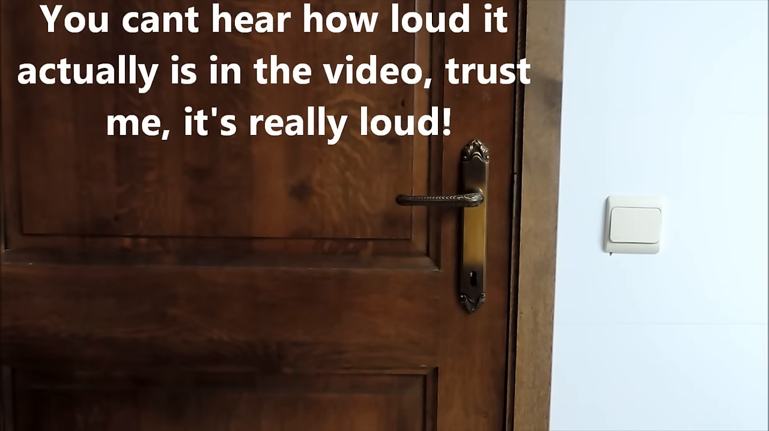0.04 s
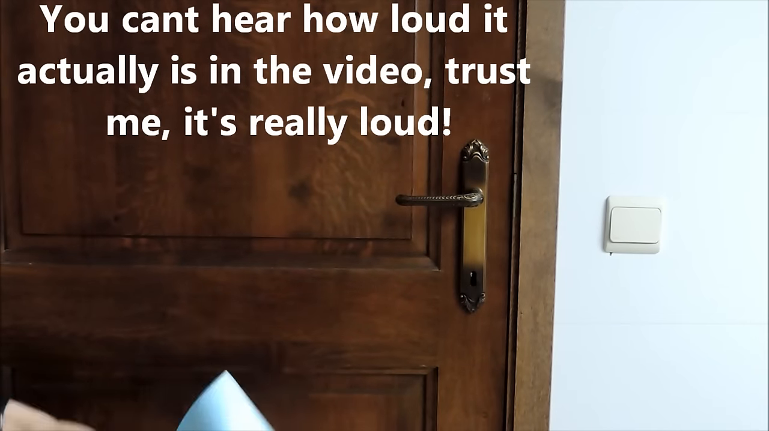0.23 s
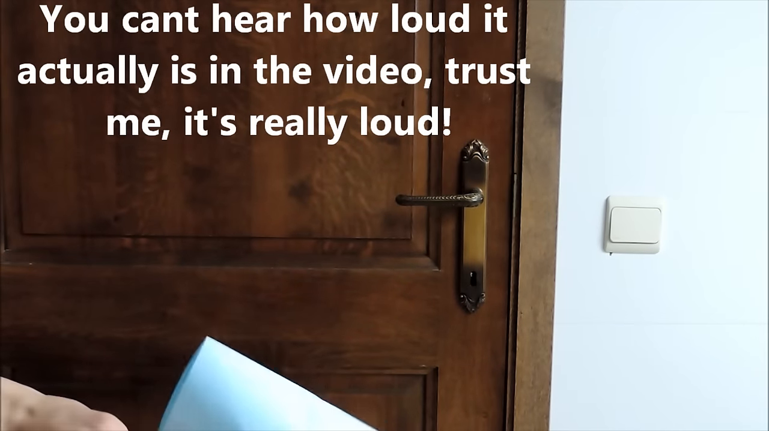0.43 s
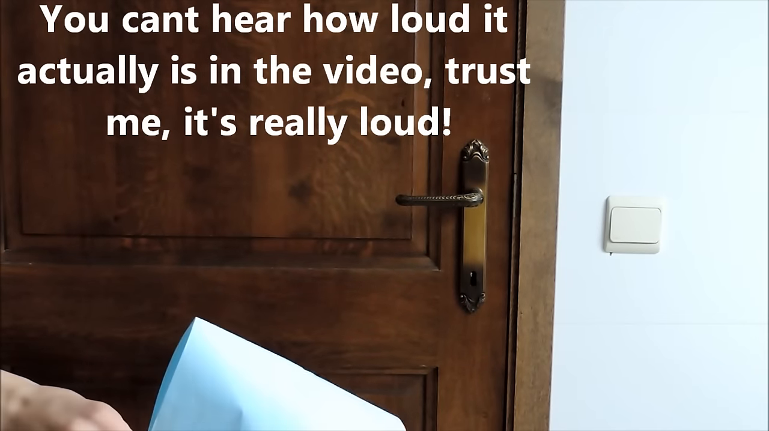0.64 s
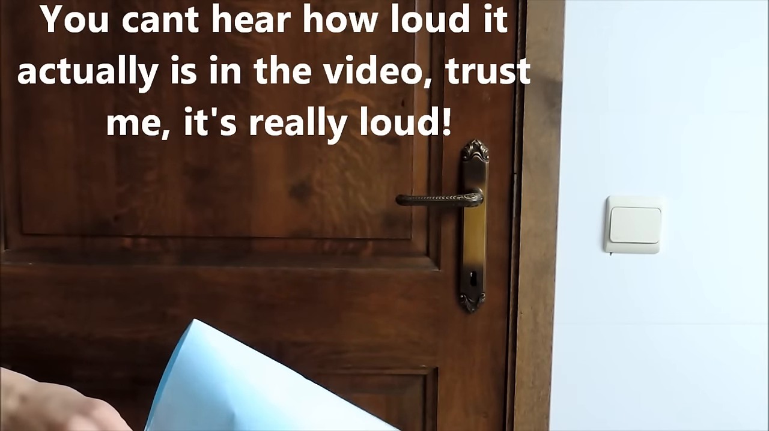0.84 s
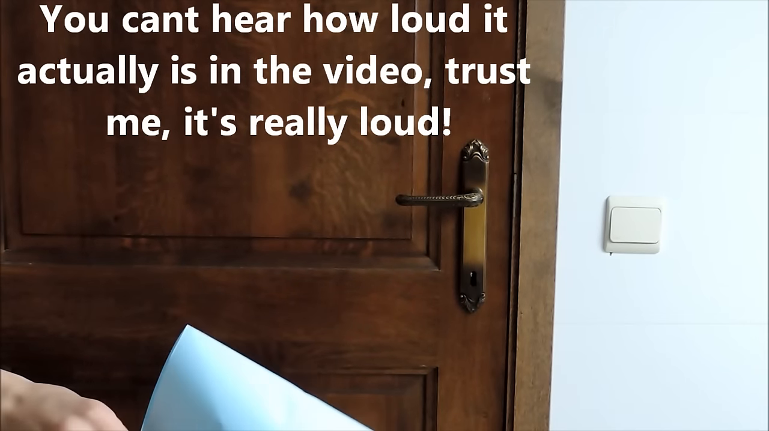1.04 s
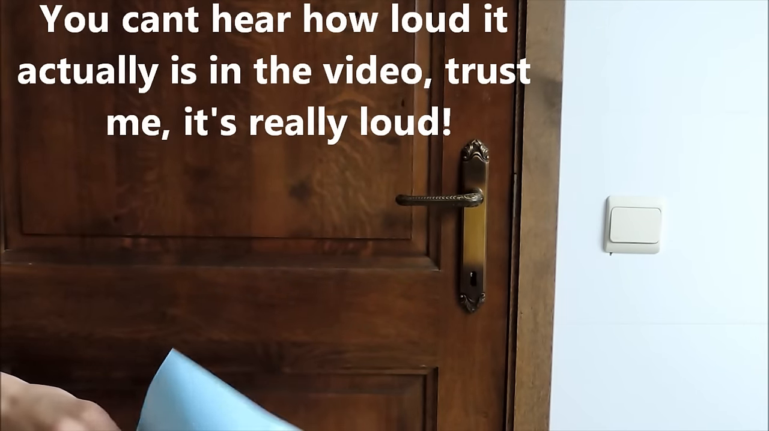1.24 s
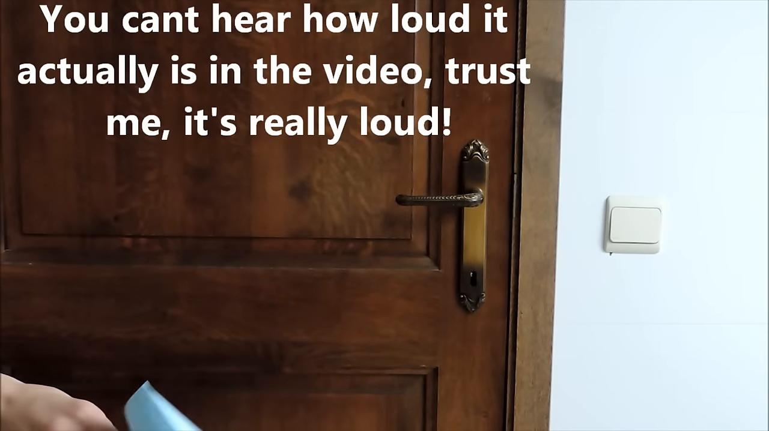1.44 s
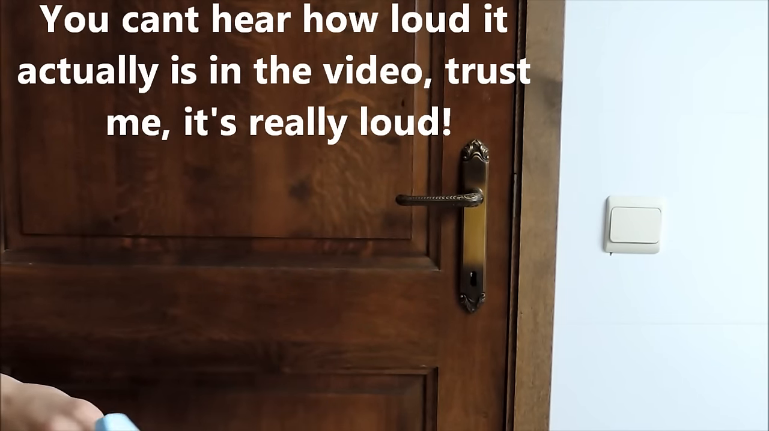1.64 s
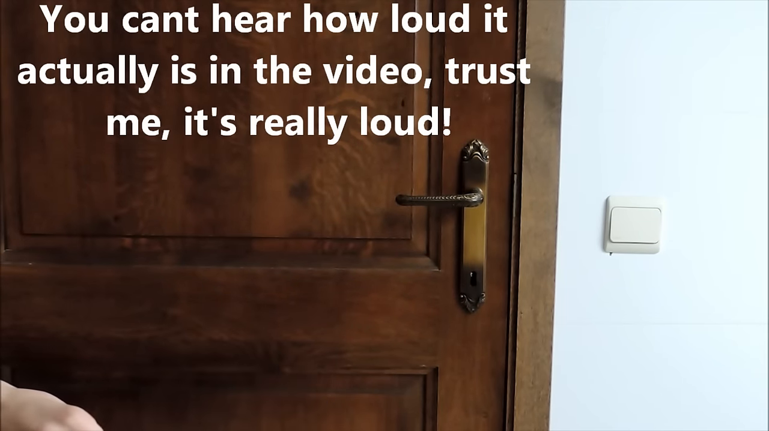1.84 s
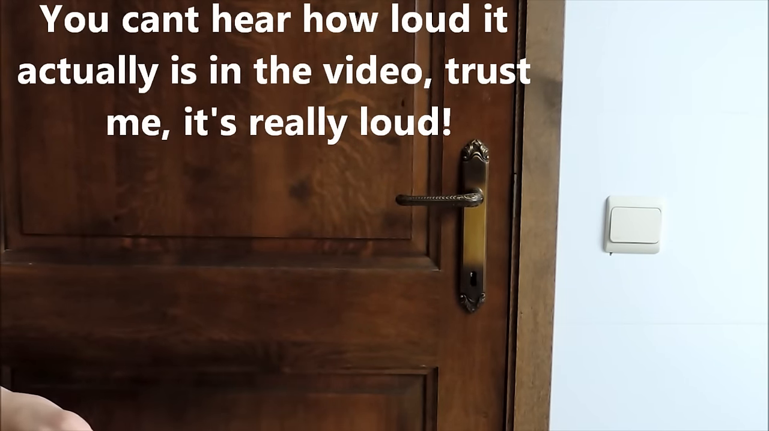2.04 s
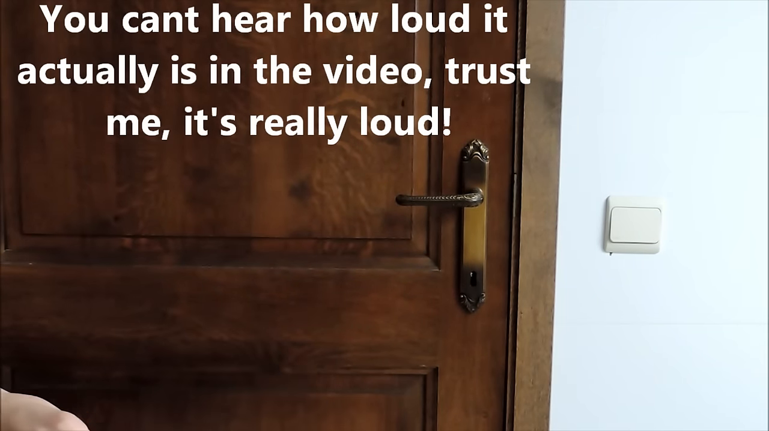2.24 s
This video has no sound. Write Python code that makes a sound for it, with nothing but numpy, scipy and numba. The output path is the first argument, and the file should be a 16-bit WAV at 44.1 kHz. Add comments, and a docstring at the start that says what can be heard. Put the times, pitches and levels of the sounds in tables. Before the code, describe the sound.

A folded paper popper bangs once, sharp and loud, right after a quick swish and puff of air. The small bare room rings briefly and the close microphone overloads. Soft paper taps follow over faint hiss and hum.

```python
"""A folded paper popper is swung down in a small, bare room, close to a phone, over hiss and mains hum.
Air swishes over the sheet, its creases give way and a puff of air strikes the microphones.
The flap then snaps out: one pressure pulse excites the room's reverberation and overloads the phone,
whose gain control ducks and creeps back. A second later come soft handling taps of the paper."""
import sys
import numpy as np
from scipy import signal
from scipy.fft import rfft, irfft
from scipy.io import wavfile
from numba import njit

SR = 44100
rng = np.random.default_rng(int(sys.argv[2]) if len(sys.argv) > 2 else 0)


def materialize(psi):
    """Save the field psi as 16-bit PCM at rate SR to the path in sys.argv[1].

    A 1-D psi becomes a single channel; in a 2-D psi each row is a channel.
    """
    bounded = np.clip(np.atleast_2d(psi).T, -1, 1)
    quanta = np.round(bounded * 32767).astype(np.int16)
    wavfile.write(sys.argv[1], SR, quanta)


N = 105840

# spectrum of the flap's pressure pulse: f/Hz, relative level/dB
PULSE_SPECTRUM = [(30, -30), (100, -32), (200, -18.5), (450, -10.5), (700, -6), (1100, -1), (1700, -3.5),
                  (2500, -13), (4000, -25.5), (7000, -33), (12500, -35.5), (15000, -58.5)]
# envelope of the air and paper noise through the swing: t/s, level/dB
SWISH_ENVELOPE = [(0.10, -76.5), (0.142, -52), (0.165, -44.5), (0.19, -44), (0.208, -43), (0.221, -27.5),
                  (0.23, -25)]
# spectrum of that noise: f/Hz, relative level/dB
SWISH_SPECTRUM = [(30, 0), (100, -8.5), (300, -12.5), (1000, -2.5), (2200, -7), (4000, -26), (8000, -38),
                  (15000, -50)]
# creases giving way, then taps: t/s, level/dB, resonance f/Hz, resonance width/octaves,
# crisp treble level/dB and low body level/dB (both against the resonance), crackle decay time/s
PAPER_CLICKS = [(0.1715, -1.5, 2100, 0.57, -26.5, -17, 0.00089), (0.189, -15, 2600, 0.71, 13, -29, 0.0056),
                (1.398, -22, 850, 0.73, -46, 1, .012), (1.4497, -16.5, 905, 1.0, -37, -0.5, 0.0024),
                (1.4519, -8, 1330, 0.75, -50, -5.5, .001), (1.513, -23.5, 1160, 0.14, -42, -20, 0.0012),
                (1.7233, -11.5, 1878, 0.61, -36, -9.5, 0.0067)]
# spectrum of the puff of air at the microphones: f/Hz, relative level/dB
PUFF_SPECTRUM = [(15, -6.5), (30, -2.5), (60, -8.5), (120, -21.5), (400, -55), (2000, -90.5)]
# reverberation time by band: f/Hz, T60/s
REVERBERATION_TIMES = [(60, .19), (170, .38), (350, .47), (700, 0.57), (1100, 0.53), (2000, .47),
                       (3200, 0.41), (5000, .43), (8000, 0.41), (14000, 0.38)]
# clusters of close room modes that ring on: f/Hz, relative level/dB, T60/s
MODE_CLUSTERS = [(164.3, 0, .38), (221, 4, .72), (627, -10.5, 0.33), (680, -8, 1), (714, -14.5, 0.84),
                 (759, -10.5, 0.46), (839, -4, .5), (910, -13, 0.84), (980, -10, 0.36), (1014, -6, 0.74),
                 (1065, -14, 0.95), (1126, -11, .7), (1279, -9, .7)]
# left-right difference of the diffuse field: f/Hz, side level against mid/dB
SIDE_SPECTRUM = [(40, -0.5), (150, -3), (300, -10.5), (650, -12), (1200, -6), (2200, -1.5), (4000, 0.5),
                 (15000, -0.5)]
# spectral density of room rumble and microphone hiss: f/Hz, relative level/dB
BACKGROUND_SPECTRUM = [(20, -0.5), (35, 1.5), (65, -16), (130, -10.5), (300, -15.5), (600, -19),
                       (1200, -19.5), (2300, -22), (4000, -28.5), (8000, -33.5), (13000, -36), (15000, -44)]


def flap_pulse(start_s=0.227, energy_db=42.5):
    """Impulsive radiation: the inner flap snaps out and displaces air in a single pressure pulse."""
    out = np.zeros(N)
    add(out, start_s, undb(energy_db) * minimum_phase(undb(at(PULSE_SPECTRUM, bins()))))
    return out


def swish():
    """Flow noise: air rushes over the paper, louder as the arm speeds up, until the flap opens."""
    t = np.arange(N) / SR
    times, levels_db = np.array(SWISH_ENVELOPE).T
    envelope = undb(np.interp(t, times, levels_db)) * (t > times[0]) * (t < times[-1])
    return tint(rng.standard_normal(N), SWISH_SPECTRUM) * envelope


def paper_clicks():
    """Impulse excitation: each crease or tap sends a click and crackle through a sheet resonance."""
    out, f = np.zeros(N), bins() + 1
    t = np.arange(N // 20) / SR
    for start_s, db, hz, octaves, crisp_db, body_db, decay_s in PAPER_CLICKS:
        drive = rng.standard_normal(len(t)) ** 3 * np.exp(-t / decay_s)  # cubed noise crackles
        drive = unit_energy(drive)
        drive[0] += 1  # the opening click
        resonance = np.exp(-.5 * (np.log2(f / hz) / octaves) ** 2)
        body = undb(body_db) / (1 + (f / hz) ** 2)
        sheet = minimum_phase(resonance + undb(crisp_db) + body)
        add(out, start_s, undb(db) * unit_energy(signal.fftconvolve(drive, sheet)))
    return out


def air_puff(peak_s=0.19, peak_db=-17.5, rise_s=.006, fall_s=.06):
    """Wind noise: air pushed by the sheet makes the pressure fluctuate at each microphone port."""
    t = np.arange(N) / SR - peak_s
    envelope = np.exp(np.where(t < 0, t / rise_s, -(t / fall_s) ** 2))
    return undb(peak_db) * tint(rng.standard_normal((2, N)), PUFF_SPECTRUM) * envelope


def reverberation(first_wall_s=0.0057, scatter_db=-13.5, early_db=3, early_s=0.092):
    """Diffuse decay: faint scatter, dense early reflections, then an exponential tail in each band."""
    t = np.arange(N) / SR
    spectrum, tail = rfft(diffuse_noise()), 0
    for hz, t60 in REVERBERATION_TIMES:
        band = at([(f, f == hz) for f, _ in REVERBERATION_TIMES], bins())
        tail = tail + irfft(spectrum * band, N) * np.exp(-np.log(1000) * t / t60)
    onset = np.where(t < first_wall_s, undb(scatter_db), 1)
    early_boost = 1 + undb(early_db) * np.exp(-(t / early_s) ** 2)
    return np.sqrt(2) * unit_energy(tail * onset * early_boost)


def room_modes(level_db=-70.5, spread_hz=6):
    """Standing waves: clusters of three close modes beat as they decay, with a phase for each channel."""
    t, out = np.arange(N) / SR, 0
    for hz, db, t60 in MODE_CLUSTERS:
        envelope = undb(level_db + db) * np.exp(-np.log(1000) * t / t60)
        for detune, phase, left, right in rng.random((3, 4)):
            f = hz + spread_hz * (2 * detune - 1)
            out = out + envelope * np.sin(2 * np.pi * (f * t + phase) + np.array([[left], [right]]))
    return out


def in_room(x, room, direct_db):
    """Superposition: the direct sound plus its convolution with the room's impulse response."""
    return undb(direct_db) * x + signal.fftconvolve(x[None], room, axes=1)[:, :N]


def background(noise_db=-56, hum_hz=100.7, hum_db=-65.5):
    """Stationary noise: broadband room rumble and microphone hiss, with a pure tone of mains hum."""
    hum = np.sqrt(2) * np.sin(2 * np.pi * hum_hz * np.arange(N) / SR)
    return undb(noise_db) * tint(diffuse_noise(), BACKGROUND_SPECTRUM) + undb(hum_db) * hum


def diffuse_noise():
    """Partial coherence: white noise from all sides differs somewhat at two close microphones."""
    mid, side = rfft(rng.standard_normal((2, N)))
    width = undb(at(SIDE_SPECTRUM, bins()))
    left_right = mid + np.array([[1], [-1]]) * width * side
    return irfft(left_right / np.sqrt(1 + width ** 2), N)


def undb(db):
    """Amplitude ratio of a level in decibels."""
    return 10 ** (np.asarray(db) / 20)


def at(table, hz):
    """Interpolation of a table on a log-frequency axis."""
    f, values = np.array(table, float).T
    return np.interp(np.log(np.maximum(hz, 1)), np.log(f), values)


def bins():
    """Fourier frequencies of a full-length sound."""
    return np.arange(N // 2 + 1) * SR / N


def unit_energy(x):
    """Normalisation to a sum of squares of one."""
    return x / np.sqrt(np.sum(x ** 2))


def minimum_phase(gain):
    """Minimum phase: the most compact causal pulse with this spectrum, of unit energy."""
    cepstrum = irfft(np.log(gain + 1e-9), N)
    cepstrum[1:N // 2] *= 2
    cepstrum[N // 2 + 1:] = 0
    return unit_energy(irfft(np.exp(rfft(cepstrum)), N)[:N // 20])


def tint(x, spectrum):
    """Spectral shaping of white noise at constant power."""
    gain = undb(at(spectrum, bins()))
    return irfft(rfft(x) * gain / np.sqrt(np.mean(gain ** 2)), N)


def add(out, start_s, x):
    """Superposition of x on out after a delay."""
    i = int(start_s * SR)
    x = x[..., :N - i]
    out[..., i:i + x.shape[-1]] += x


@njit
def gain_control(peak, threshold, depth_db, attack_db_per_s, hold_s, recovery_db_per_s):
    """Automatic gain control: overload ramps up a cut in dB, which holds, then recedes steadily."""
    out, cut_db, wait_s = np.zeros(len(peak)), 0., 0.
    for i in range(len(peak)):
        wait_s = hold_s if peak[i] > threshold else wait_s - 1 / SR
        if wait_s > 0:
            cut_db = min(depth_db, cut_db + attack_db_per_s / SR)
        else:
            cut_db = max(0., cut_db - recovery_db_per_s / SR)
        out[i] = cut_db
    return out


@njit
def peak_envelope(peak, attack_s, release_s):
    """Envelope detection: a first-order lag with separate time constants for rise and fall."""
    out, envelope = np.zeros(len(peak)), 0.
    for i in range(len(peak)):
        lag_s = attack_s if peak[i] > envelope else release_s
        envelope += (peak[i] - envelope) / (1 + SR * lag_s)
        out[i] = envelope
    return out


def scene():
    """Linear superposition: swish, clicks and pulse share one room; puff and background add directly."""
    room = reverberation() + room_modes()
    paper = in_room(swish(), room, direct_db=-1.5) + in_room(paper_clicks(), room, direct_db=-11)
    bang = in_room(flap_pulse(), room, direct_db=-15)
    return bang + paper + air_puff() + background()


def record(dry, limit_db=5, clip_knee=6, cutoff_hz=15500):
    """Dynamic compression: the phone ducks its gain, limits the bang, clips softly and cuts the top."""
    cut_db = gain_control(np.abs(dry).max(axis=0), threshold=float(undb(-3)), depth_db=13.,
                          attack_db_per_s=109.5, hold_s=0.19, recovery_db_per_s=17.)
    ducked = dry * undb(-cut_db)
    envelope = peak_envelope(np.abs(ducked).max(axis=0), attack_s=0.001, release_s=0.015)
    limited = ducked / np.maximum(1, envelope / undb(limit_db))
    clipped = limited / (1 + np.abs(limited) ** clip_knee) ** (1 / clip_knee)
    return signal.sosfilt(signal.ellip(8, .1, 70, cutoff_hz, fs=SR, output="sos"), clipped)


dry = scene()
out = record(dry)
materialize(out)
```